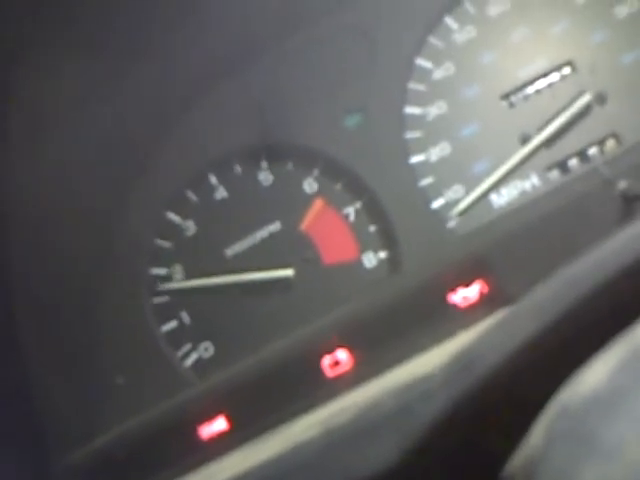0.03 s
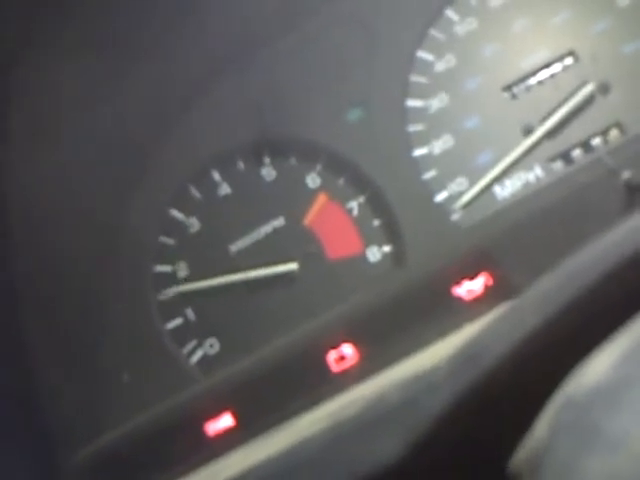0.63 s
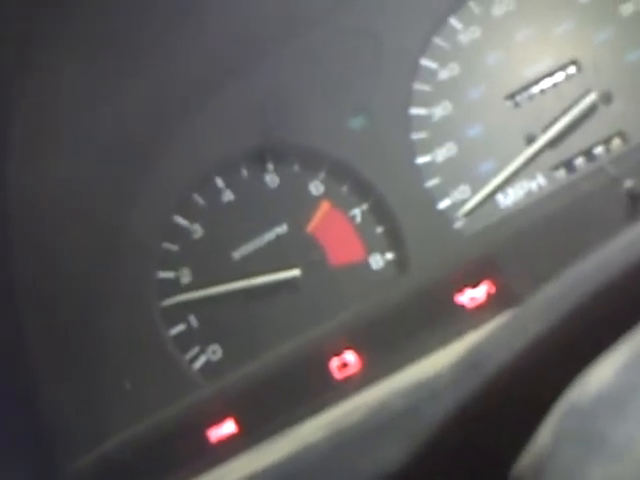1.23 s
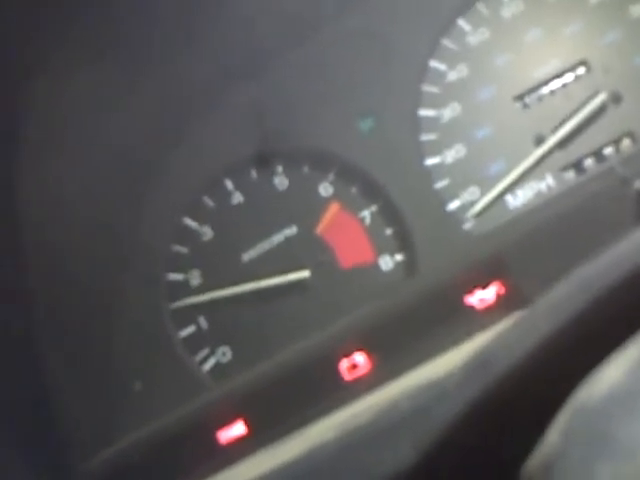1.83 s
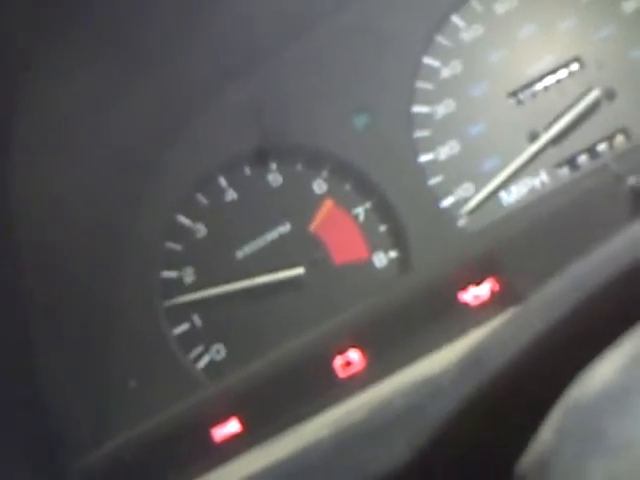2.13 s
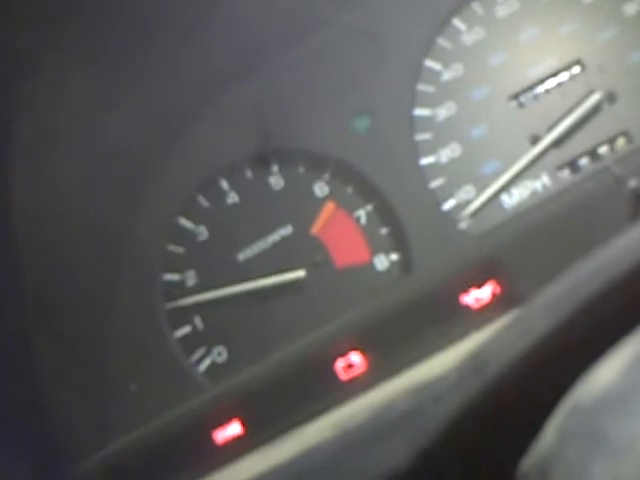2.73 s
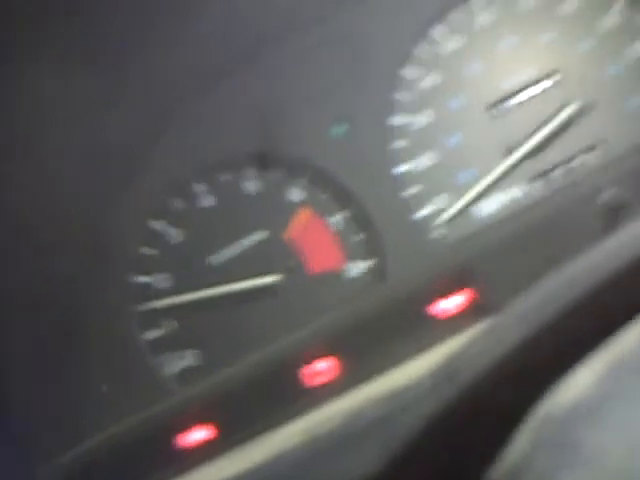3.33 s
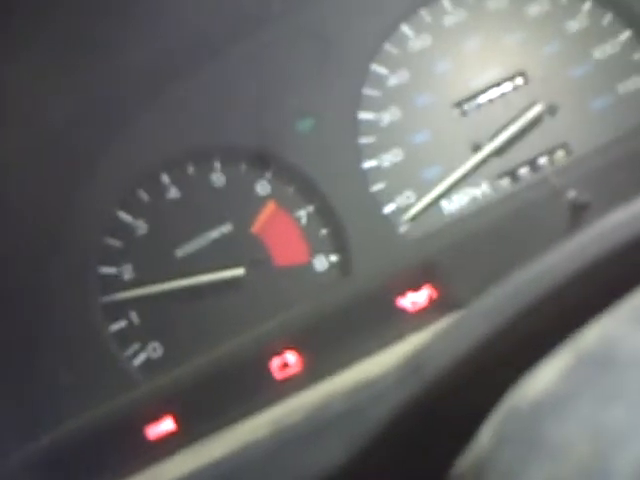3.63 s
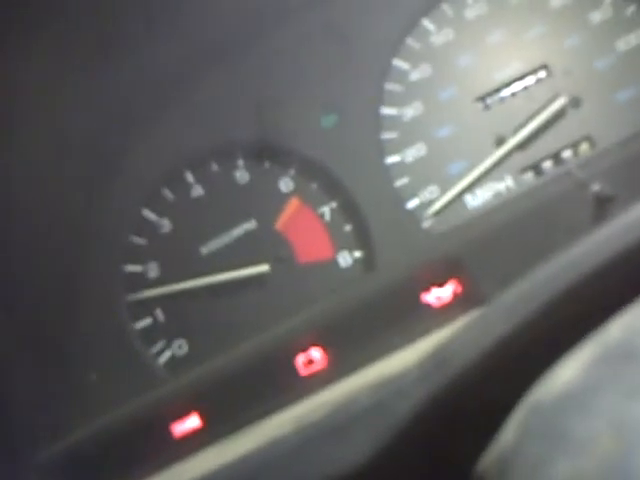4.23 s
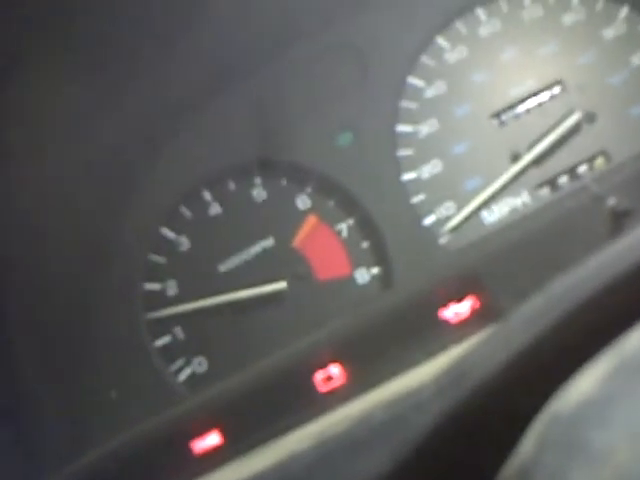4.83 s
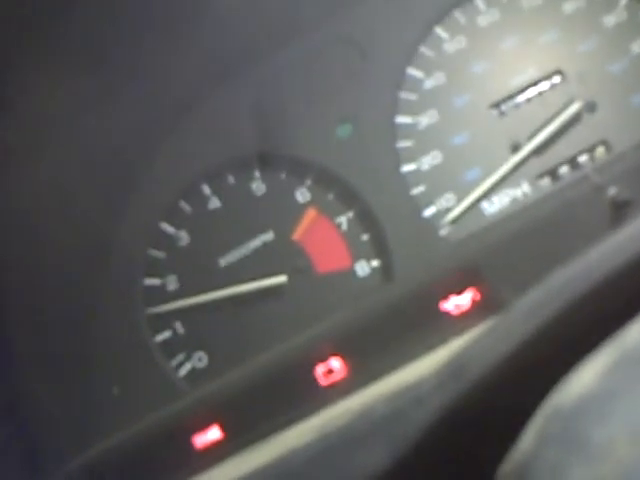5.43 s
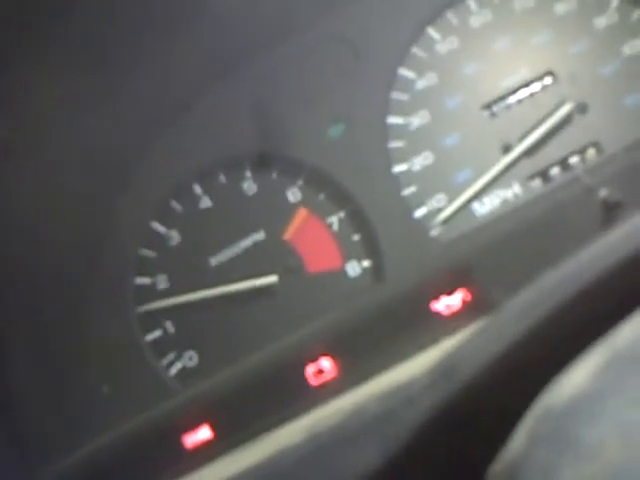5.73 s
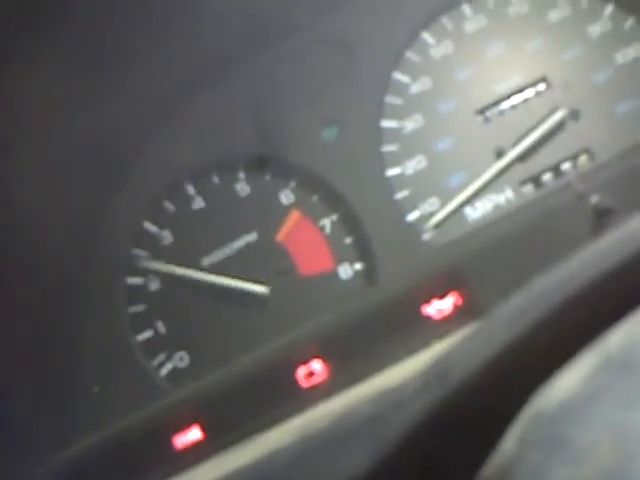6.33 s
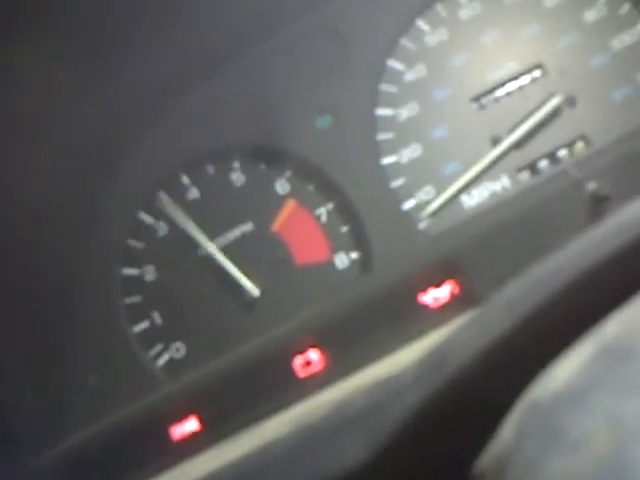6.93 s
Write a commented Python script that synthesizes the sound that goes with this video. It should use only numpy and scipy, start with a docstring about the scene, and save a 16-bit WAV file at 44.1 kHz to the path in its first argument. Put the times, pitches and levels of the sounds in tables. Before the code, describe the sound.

A car engine runs at a quick, even idle, slowly growing a little louder, with soft mechanical clatter behind it and the odd faint cabin rattle. Then come three short, loud revs, each higher than the last, deep and boomy with a rough rasping edge. It is all heard from the driver's seat in the closed space of the cabin, through a small microphone that overloads on the peaks.

```python
"""Inside a car, a small camera microphone at the driver's seat: a four-cylinder engine idles fast,
then takes three stabs of the throttle. Exhaust orders boom in the cabin as they sweep through the
pipe's resonances, and the open throttle rings the intake with a harsh rasp. Behind them the valve gear
clatters in the engine bay and loose trim rattles faintly. The microphone overloads on the loudest revs."""
import sys
import numpy as np
from scipy import signal
from scipy.fft import rfft, irfft
from scipy.io import wavfile

SR = 44100
rng = np.random.default_rng(int(sys.argv[2]) if len(sys.argv) > 2 else 0)


def wav_out(sig):
    """Save sig, one row per channel (or a flat mono array), as 16-bit PCM at SR to the path in sys.argv[1]."""
    wavfile.write(sys.argv[1], SR, np.round(np.clip(np.atleast_2d(sig).T, -1, 1) * 32767).astype(np.int16))


N = 313110
T = np.arange(N) / SR

# engine speed at idle, then through the revs: (time [s], firing rate [Hz])
IDLE_FIRING_RATE = [(0.0, 49.0), (0.49, 47.3), (1.47, 46.4), (3.56, 46.3), (4.0, 45.1), (4.9, 45.5),
                    (5.68, 44.5)]
REV_FIRING_RATE = [(5.74, 45.9), (5.75, 46.0), (5.982, 71.8), (6.126, 78.5), (6.246, 77.9), (6.3, 79.1),
                   (6.406, 97.8), (6.5, 108.7), (6.78, 100.3), (7.012, 140.3), (7.1, 150.2)]
# stabs of the throttle: (opens [s], shuts [s], boom trim [dB], rasp trim [dB], pause before rebound [s])
THROTTLE_STABS = [(5.716, 5.963, -4.5, 0, 0.012), (6.252, 6.5, -1.5, 0, 0.089),
                  (6.724, 7.073, -2, 1.5, 0.015)]
# booming orders: (order [x firing rate], coasting level [dB], loaded level [dB])
EXHAUST_BOOM_ORDERS = [(1, -7.5, 3), (2, -15.5, -2), (3, -14, -8.5), (4, -16, -19)]
# exhaust pipe and cabin as heard at the seat: (frequency [Hz], gain [dB])
PIPE_RESPONSE = [(45, -11), (60, -16), (80, -15), (103, -14), (117, -5.5), (140, -7), (160, -6),
                 (175, -4.5), (207, -9), (222, -16), (250, -21), (285, -31), (320, -13), (390, -6),
                 (435, -17), (480, -1), (600, -6)]
# the exhaust's thump: (time [s], frequency [Hz], level [dB], t60 [s])
EXHAUST_THUMP = (6.54, 162, -8, .2)
# exhaust note at idle: (order [x firing rate], full level [dB], swell up to that level [dB])
IDLE_NOTE_ORDERS = [(2, -33.5, 9.5), (3, -29.5, 8), (3.5, -49, -4.5), (4, -26, 4), (5, -39.5, 7.5),
                    (6, -39.5, 7.5), (7, -45, 4), (7.75, -45, 2.5), (8.75, -50.5, 9.5), (10, -55.5, -3),
                    (11, -49.5, 16.5)]
# tone of each broad sound at the seat: (frequency [Hz], relative level [dB])
GROWL_SPECTRUM = [(20, 3), (100, -5), (200, 9), (250, -6), (320, -0.5), (400, -8), (450, -3), (620, -5),
                  (760, -30), (1000, -14.5), (1800, -30), (4000, -39), (10000, -70)]
RASP_SPECTRUM = [(260, -28), (450, -0.5), (650, -3.5), (880, -7), (1120, -1.5), (1400, -8), (1950, -6.5),
                 (2400, -10.5), (2900, -10), (3700, -15.5), (5500, -23.5), (6700, -28.5), (9000, -26.5),
                 (10800, -22.5)]
BODY_PANEL_SPECTRUM = [(15, 0), (28, 5), (45, -11), (70, -16.5), (160, 8.5), (200, -2.5), (250, -11),
                       (310, -1.5), (350, -6), (400, -5.5), (435, -25.5), (700, -17.5), (1500, -49),
                       (8000, -80)]
IDLE_RUMBLE_SPECTRUM = [(15, -12.5), (27, 7), (42, 7), (60, -2.5), (110, -8.5), (170, -15.5), (245, -15.5),
                        (330, -4.5), (395, -17.5), (440, -21.5), (600, -28.5), (1000, -82.5)]
VALVE_CLATTER_SPECTRUM = [(260, -35.5), (450, -3.5), (505, 1), (620, -5), (860, -15.5), (1000, -10.5),
                          (1400, -11), (1900, -12.5), (2100, -14), (2400, -22.5), (3100, -15), (4000, -28),
                          (6500, -38.5), (8000, -37.5), (10800, -30.5)]
METAL_CHATTER_SPECTRUM = [(1200, -12), (3200, 9.5), (4500, 4), (5500, 4.5), (6600, -7), (7800, 2.5),
                          (9400, -4.5), (10600, 0)]
# ringing of cabin, intake and engine bay: (frequency [Hz], width [Hz], gain [dB])
CABIN_RESONANCES = [(328, 16, 1), (393, 8, 4)]
INTAKE_RESONANCES = [(639, 19, 8), (737, 46, 6.5), (1095, 96, 1), (1561, 28, 7), (1860, 37, -11),
                     (2800, 250, -15)]
BAY_RESONANCES = [(1059, 15, 9), (1095, 12, 8), (1624, 8, 4), (1805, 19, -12), (1900, 14, 7.5),
                  (3460, 260, -14)]
# faint whine: (frequency [Hz], full level [dB])
WHINE_TONES = [(8620, -84), (8685, -83)]
# loose trim in the cabin: (time [s], relative level [dB])
TRIM_RATTLES = [(0.601, -52), (1.115, -53), (1.719, -53), (1.803, -54), (2.499, -54), (3.623, -52),
                (3.709, -49), (4.353, -49), (5.061, -50), (5.125, -48)]

IDLE_HZ = 45  # nominal firing rate at idle
SWELL_S = 3.2  # time over which the idle grows louder, as the camera's gain comes up
REV_START_S, REV_FADE_S = 5.73, 0.082
LOAD_RISE_S, LOAD_EASE_S = 0.08, 0.054
DROP_DB, DROP_S, REBOUND_LOAD, REBOUND_S = -4, 0.015, 0.83, 0.019
GROWL_DB, GROWL_LOAD_DB, GROWL_DB_PER_HZ = -29, 1, 0.0443
RASP_DB, RASP_DB_PER_HZ, COAST_DB = -26, 0.0665, -23
RASP_RISE_S, RASP_LEAD_S, RASP_FALL_DB_PER_S = 0.15, 0.041, 99
IDLE_DB, IDLE_SWELL_DB, LOPE_DB, LOPE_FROM_ORDER = -24, 5, 2.5, 7
THROB_DB, THROB_BUILD_S = -23.5, 2.8
CLATTER_DB, CLATTER_SWELL_DB = -47.5, 7.5


def rev_exhaust(firings, speed_hz, load, boom_db):
    """Four orders boom as they sweep through the pipe's resonances, over a rough growl of higher ones."""
    boom = 0
    for order, coast_db, loaded_db in EXHAUST_BOOM_ORDERS:
        gain = amp(coast_db + (loaded_db - coast_db) * load) * gain_at(PIPE_RESPONSE, order * speed_hz)
        boom += gain * order_wave(firings, order, lag=0.1307, rough=0.19)
    uneven_timing = firings + 0.023 * wander(73)
    buzz = overtones(uneven_timing, uneven_db=-10, first_order=4) * amp(2 * wander(55))
    growl = colour(buzz, GROWL_SPECTRUM, CABIN_RESONANCES)
    rumble = colour(rng.standard_normal(N), BODY_PANEL_SPECTRUM, CABIN_RESONANCES)
    growl_db = GROWL_DB + GROWL_LOAD_DB * load + GROWL_DB_PER_HZ * (speed_hz - IDLE_HZ)
    return amp(boom_db) * boom + amp(growl_db) * (amp(4.5) * growl + amp(3.9) * rumble)


def intake_rasp(firings, speed_hz, open_db):
    """With the throttle open, gulps of air and hard combustion knocks ring the intake."""
    rasp_db = RASP_DB + open_db + RASP_DB_PER_HZ * (speed_hz - IDLE_HZ)
    blows = cabin_reflections(knocks(firings, spread_db=2, count=48), t60=0.057, wet_db=4.5)
    gulps = puffs(firings, depth_db=1, cylinder_db=1.1)
    rasp = colour(gulps + amp(1.5) * blows, RASP_SPECTRUM, INTAKE_RESONANCES)
    # the hiss at the throttle plate grows faster than the rasp does
    hiss = colour(puffs(firings, depth_db=2, cylinder_db=1), METAL_CHATTER_SPECTRUM)
    return amp(rasp_db + 4) * rasp + amp(1.2 * rasp_db - 3) * hiss


def throttle():
    """Each stab builds, holds and lets go: gives the load and the dB offsets of boom and rasp."""
    load, boom_db, open_db = np.zeros(N), np.zeros(N), np.full(N, COAST_DB)
    for opens, shuts, boom_trim_db, rasp_trim_db, pause in THROTTLE_STABS:
        held = ramp(opens, LOAD_RISE_S) * (1 - ramp(shuts - LOAD_EASE_S, LOAD_EASE_S))
        # the boom drops out as the throttle shuts, then rebounds once
        boom_db += boom_trim_db * held + DROP_DB * np.exp(-((T - shuts) / DROP_S) ** 2)
        load += held + REBOUND_LOAD * np.exp(-((T - shuts - pause) / REBOUND_S) ** 2)
        # the rasp swells, and starts to die just before the throttle shuts
        swell = 1 - (1 - ramp(opens, RASP_RISE_S)) ** 2
        fall_db = RASP_FALL_DB_PER_S * np.maximum(T - shuts + RASP_LEAD_S, 0)
        open_db = np.maximum(open_db, COAST_DB + (rasp_trim_db - COAST_DB) * swell - fall_db)
    return load, boom_db, open_db


def exhaust_thump():
    """One low ring of the pipe as the throttle snaps shut after the second stab."""
    start, hz, db, t60 = EXHAUST_THUMP
    age = np.maximum(T - start, 0)
    return amp(db - 60 * age / t60) * np.sin(2 * np.pi * hz * age)


def idle_exhaust(firings, speed_hz):
    """Clean firing orders, a lope at the rate of the whole cycle, and a soft rumble of the body panels."""
    # one cylinder is stronger, so the upper orders pulse once in every four firings
    pulse = unit_rms(amp(LOPE_DB * np.cos(np.pi * firings / 2)))
    throb = amp(THROB_DB) * (1 - np.exp(-T / THROB_BUILD_S))
    orders = [(1, throb)]
    for order, db, swell_db in IDLE_NOTE_ORDERS:
        gain = amp(db - swell_db * still_quiet())
        orders.append((order, gain * pulse if order >= LOPE_FROM_ORDER else gain))
    note = 0
    for order, gain in orders:
        cabin_gain = abs(ringing(order * speed_hz, CABIN_RESONANCES))
        note += gain * cabin_gain * order_wave(firings, order, lag=0.132, rough=0.06)
    buzz = overtones(firings, uneven_db=-5.5, first_order=10) * amp(0.62 * wander(25))
    lope = amp(-13.5) * colour(buzz, BODY_PANEL_SPECTRUM, CABIN_RESONANCES)
    rumble = amp(-8) * colour(rng.standard_normal(N), IDLE_RUMBLE_SPECTRUM)
    return note + amp(IDLE_DB - IDLE_SWELL_DB * still_quiet()) * (lope + rumble)


def valve_gear(firings):
    """Ahead of the seat, tapping and hiss ring the engine bay, topped by chatter and a thin whine."""
    swell = amp(0.2 * wander(2.2) - CLATTER_SWELL_DB * still_quiet())
    taps = cabin_reflections(knocks(firings, spread_db=4, count=60), t60=0.074, wet_db=5.5)
    hiss = amp(-2) * puffs(firings, depth_db=1, cylinder_db=-0.5)
    drive = (taps + hiss) * amp(0.5 * wander(9.2))
    clatter = amp(4) * colour(drive, VALVE_CLATTER_SPECTRUM, BAY_RESONANCES)
    flutter = puffs(firings, depth_db=2.5, cylinder_db=2.5) * amp(2 * wander(18))
    chatter = amp(-17.5) * colour(flutter, METAL_CHATTER_SPECTRUM)
    whine = sum(amp(db) * np.sqrt(2) * np.sin(2 * np.pi * hz * T + wander(6)) for hz, db in WHINE_TONES)
    return swell * (amp(CLATTER_DB) * (clatter + chatter) + whine)


def trim_rattles(t60=0.16, rise_s=0.002):
    """Loose trim around the microphone: each faint rattle is a short flurry of tiny contacts."""
    starts, db = np.transpose(TRIM_RATTLES)
    age = T[:SR // 4]
    shape = amp(-60 * age / t60) * (1 - np.exp(-age / rise_s))
    onsets = np.bincount(np.round(starts * SR).astype(int), amp(db), N)
    envelope = signal.oaconvolve(onsets, shape)[:N]
    contacts = rng.standard_normal(N) * amp(2.5 * wander(120))
    return amp(-4.5) * envelope * colour(contacts, METAL_CHATTER_SPECTRUM)


def cabin_reflections(x, t60, wet_db):
    """Short, dense reflections from the nearby glass and dashboard."""
    age = T[:SR // 5]
    tail = rng.standard_normal(len(age)) * amp(-60 * age / t60)
    return unit_rms(x + amp(wet_db) * signal.oaconvolve(x, tail / np.linalg.norm(tail))[:N])


def order_wave(firings, order, lag, rough):
    """One engine order; the pipe delays each differently and uneven burning shakes it."""
    phase = 2 * np.pi * (order * firings - lag * order ** 2)
    each_firing = np.arange(int(firings[-1]) + 2)
    burns = rng.standard_normal((2, len(each_firing)))
    size_shake, phase_shake = (rough * np.interp(firings, each_firing, burn) for burn in burns)
    return np.sqrt(2) * ((1 + size_shake) * np.cos(phase) + phase_shake * np.sin(phase))


def overtones(firings, uneven_db, first_order, size=4096):
    """Higher firing orders; no two cylinders fire alike, so weaker lines lie at the quarters between."""
    orders = np.arange(160) / 4
    levels = np.where(orders % 1 == 0, orders >= first_order, amp(uneven_db))
    cycle = irfft(levels * np.exp(2j * np.pi * rng.random(len(orders))), size)
    return unit_rms(np.interp(firings / 4 % 1, np.arange(size) / size, cycle))


def knocks(firings, spread_db, count):
    """Small blows at the same crank angles in every cycle of four firings, never quite equally hard."""
    at_cycles = np.arange(120)[:, None] + rng.random(count)
    sizes = rng.choice([-1, 1], count) * amp(spread_db * rng.standard_normal(at_cycles.shape))
    at_samples = np.searchsorted(firings / 4, at_cycles.ravel())
    return unit_rms(np.bincount(at_samples, sizes.ravel(), N + 1)[:N])


def puffs(firings, depth_db, cylinder_db):
    """Gas noise that swells with every firing, one cylinder louder than the rest."""
    phase = 2 * np.pi * firings
    swell_db = depth_db * np.cos(phase) + cylinder_db * np.cos(phase / 4)
    return unit_rms(rng.standard_normal(N) * amp(swell_db))


def colour(x, spectrum, modes=(), size=16384):
    """Filters by a broad spectrum with ringing modes on top, to rms 1."""
    hz = np.fft.rfftfreq(size, 1 / SR)
    impulse = np.fft.fftshift(irfft(gain_at(spectrum, hz) * ringing(hz, modes)))
    return unit_rms(signal.oaconvolve(x, impulse, "same"))


def ringing(hz, modes):
    """Complex gain of a set of modes on top of the direct path."""
    return 1 + sum(amp(db) / (1 + 2j * (hz - centre) / width) for centre, width, db in modes)


def gain_at(spectrum, hz):
    """A spectrum as gain, on a log-frequency axis."""
    points_hz, db = np.transpose(spectrum)
    return amp(np.interp(np.log(hz + 1), np.log(points_hz), db))


def wander(rate_hz):
    """Random drift of rms 1, mostly slower than rate_hz."""
    t = T[::100]
    hz = np.fft.rfftfreq(len(t), t[1])
    slow = irfft(rfft(rng.standard_normal(len(t))) / (1 + (hz / rate_hz) ** 4), len(t))
    return np.interp(T, t, unit_rms(slow))


def ramp(start, length):
    """Rises from 0 to 1 and stays there."""
    return np.clip((T - start) / length, 0, 1)


def still_quiet():
    """1 at first, 0 at full level."""
    return 1 - ramp(0, SWELL_S)


def amp(db):
    """Decibels to gain."""
    return 10 ** (np.asarray(db) / 20)


def unit_rms(x):
    """Scales to rms 1."""
    return x / np.sqrt(np.mean(x ** 2) + 1e-20)


def low_pass(x, hz):
    """Steep band limit."""
    return signal.oaconvolve(x, signal.firwin(701, hz, window=("kaiser", 9), fs=SR)[None], "same")


def scene():
    """At the driver's seat: one crankshaft drives the engine's layers; the revs take over from the idle."""
    speed_hz = np.interp(T, *np.transpose(IDLE_FIRING_RATE + REV_FIRING_RATE))
    firings = np.cumsum(speed_hz * (1 + 0.002 * wander(9))) / SR  # running count
    load, boom_db, open_db = throttle()
    revs = rev_exhaust(firings, speed_hz, load, boom_db)
    revs += intake_rasp(firings, speed_hz, open_db) + exhaust_thump()
    idle = idle_exhaust(firings, speed_hz)
    revving = ramp(REV_START_S, REV_FADE_S)
    return (revving * revs + (1 - revving) * idle + valve_gear(firings) + trim_rattles())[None]


def record(dry):
    """The small mono microphone saturates, the top treble is cut, and the overshoots clip once more."""
    ceiling, knee = 0.76, 8
    squashed = dry / (1 + abs(dry / ceiling) ** knee) ** (1 / knee)
    clipped = np.clip(low_pass(squashed, hz=11130), -0.7, 0.7)
    return low_pass(clipped, hz=15740)


dry = scene()
out = record(dry)
wav_out(out)
```